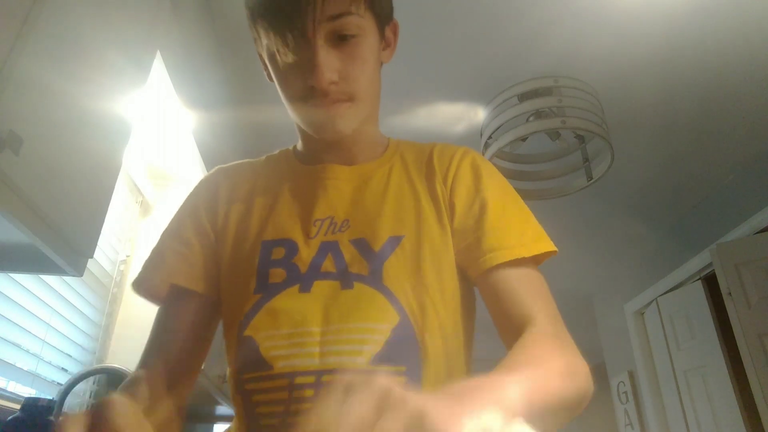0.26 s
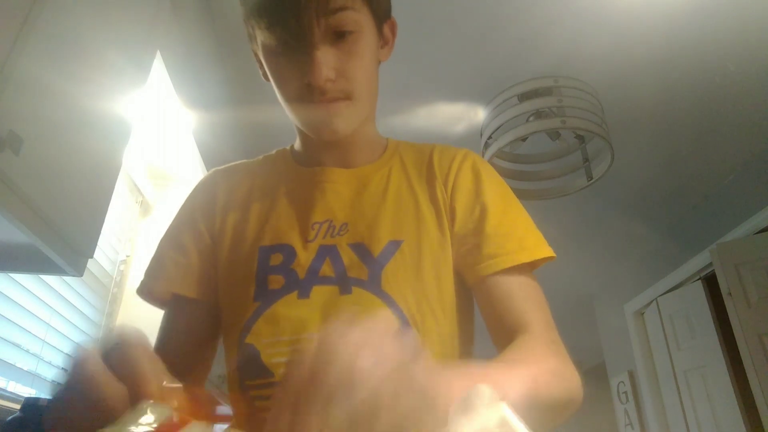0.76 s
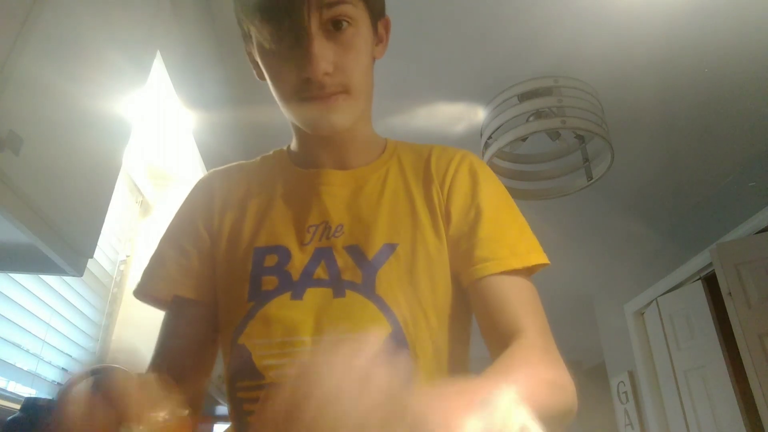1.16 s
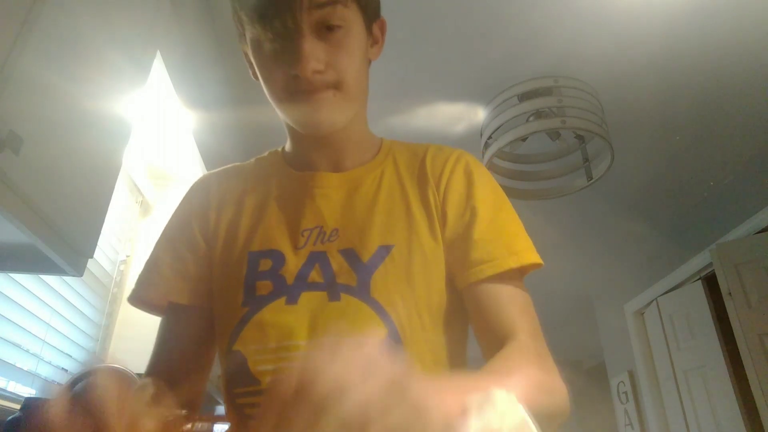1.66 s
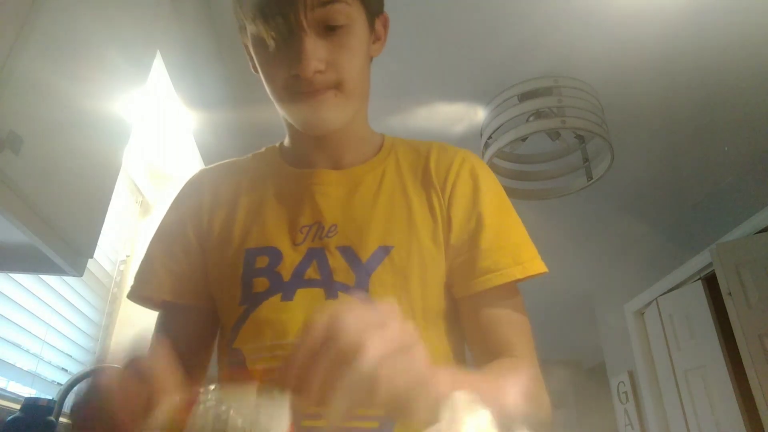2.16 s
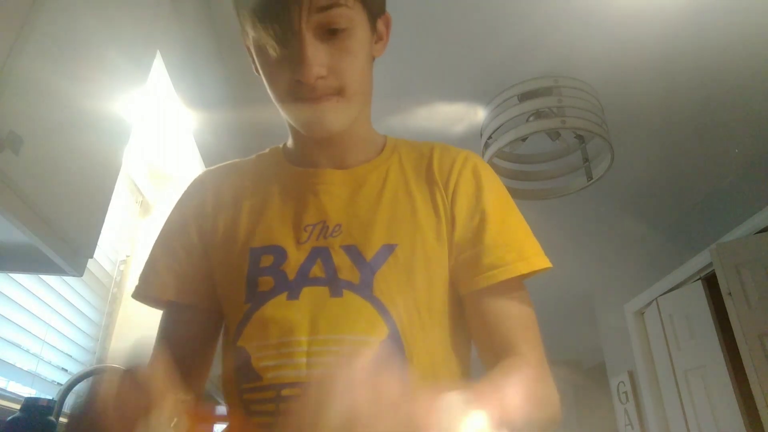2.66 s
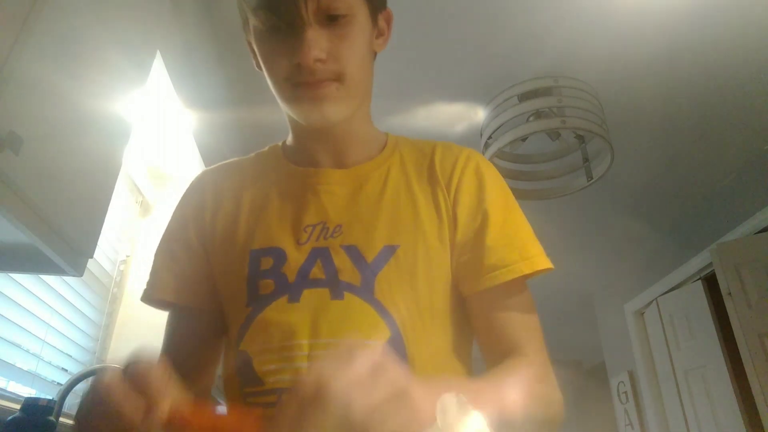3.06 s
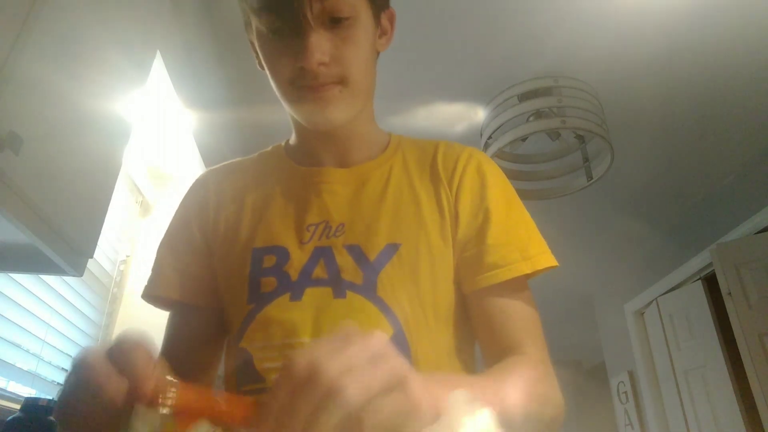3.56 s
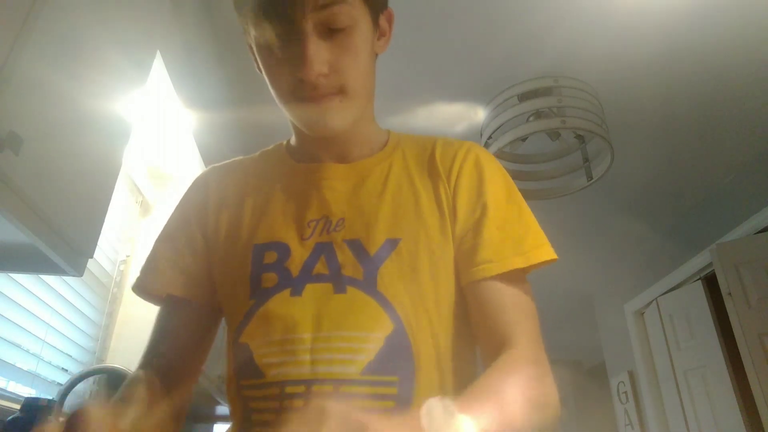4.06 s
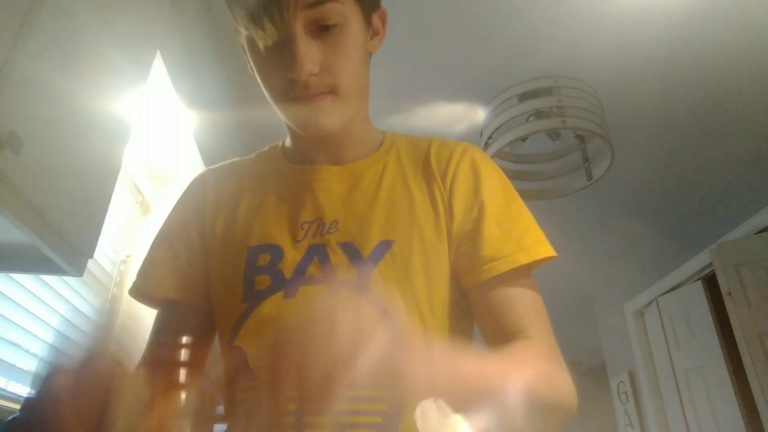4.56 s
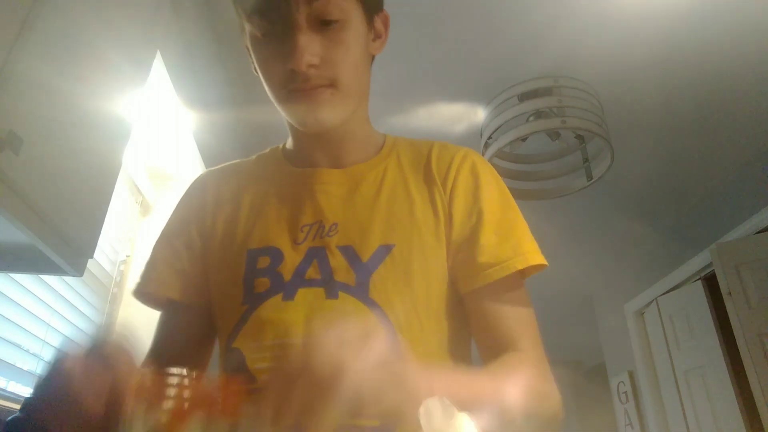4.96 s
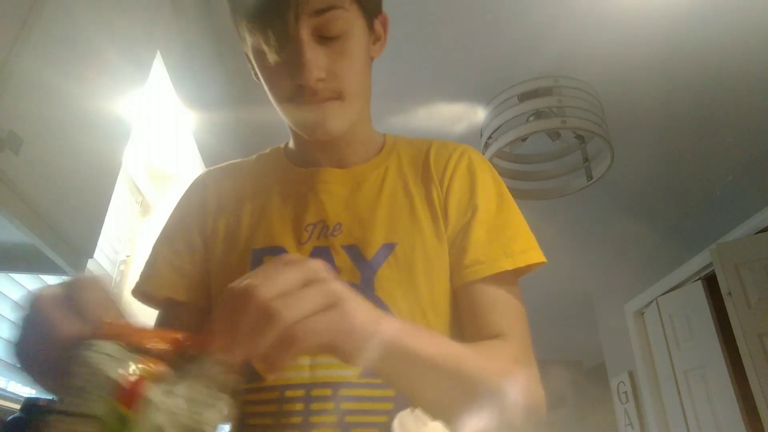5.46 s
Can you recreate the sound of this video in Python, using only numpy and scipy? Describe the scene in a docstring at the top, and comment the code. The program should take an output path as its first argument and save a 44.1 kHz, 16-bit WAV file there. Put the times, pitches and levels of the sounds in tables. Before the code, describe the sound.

A crisp foil bag of chips is shaken hard by hand about four times a second, crinkling and rattling continuously up close.

```python
"""Shaking a bag of chips

A bag of chips is shaken by hand about four times a second, close to two microphones in a small kitchen.
At each jerk the chips hit the foil and fall back a moment later. Shared random impacts drive three filters:
the crackling foil, the hollow air in the bag and the thumping load. Between jerks chips slide in uneven clumps.
Creases snap as short filtered noise bursts, and the bag walls pop as brief rounded tones.
Hand rumble, a short reverberation, quiet room noise and a wavering hum complete the sound.
"""
import sys
import numpy as np
from scipy import signal
from scipy.fft import rfft, irfft, next_fast_len
from scipy.io import wavfile
from scipy.ndimage import uniform_filter1d

SR = 44100
rng = np.random.default_rng(int(sys.argv[2]) if len(sys.argv) > 2 else 0)


def unload_wav(signal):
    """Save mono or channel-first audio to the path in sys.argv[1] as 16-bit WAV at rate SR, clipped to [-1, 1]."""
    wavfile.write(
        sys.argv[1],
        SR,
        np.round(np.clip(np.atleast_2d(signal).T, -1, 1) * 32767).astype(np.int16),
    )


N = 252516
TIME = np.arange(N) / SR

# Jerks of the bag: start_s, rise_s, settle_s, knock_db, crackle_relative_to_knock_db,
# fall_back_delay_s, fall_back_relative_to_knock_db
JERKS = [(0.086, 0.014, 0.0076, -21.5, -3.5, 0.097, -8.5), (0.281, 0.017, 0.022, -27, -3.5, 0.066, 0.5),
         (0.483, 0.0025, 0.029, -24, 0, 0.078, -6), (0.671, 0.027, 0.014, -26.5, -2.5, 0.048, -9),
         (0.914, 0.0094, 0.013, -30, -4.5, 0.027, 0), (1.027, 0.043, 0.016, -24, -1.5, 0.12, -5),
         (1.257, 0.017, 0.016, -20, -6.5, 0.087, -11.5), (1.439, 0.023, 0.012, -22.5, -2.5, 0.092, -4.5),
         (1.618, 0.023, 0.02, -26.5, 1.5, 0.093, -3), (1.985, 0.02, 0.016, -21.5, 0.5, 0.096, -9.5),
         (2.295, 0.0048, 0.018, -21.5, -3, 0.14, -9.5), (2.52, 0.021, 0.011, -22.5, -3, 0.099, -14),
         (2.766, 0.006, 0.024, -22, -4, 0.088, -13.5), (3.025, 0.0094, 0.009, -21.5, -6, 0.067, -11.5),
         (3.26, 0.0079, 0.027, -20, -0.5, 0.077, -6), (3.5, 0.0045, 0.02, -17, -1.5, 0.076, -9.5),
         (3.738, 0.0095, 0.0051, -21.5, 1, 0.068, -9), (3.927, 0.013, 0.026, -21.5, -1.5, 0.07, -1),
         (4.081, 0.037, 0.015, -23, 0.5, 0.088, -5.5), (4.272, 0.011, 0.012, -19.5, -3.5, 0.12, -5),
         (4.649, 0.0043, 0.022, -21, 0, 0.07, -8), (4.915, 0.0075, 0.015, -18.5, -1, 0.062, -5.5),
         (5.15, 0.014, 0.0076, -22, -2, 0.048, -8), (5.299, 0.024, 0.031, -25, -0.5, 0.084, -5),
         (5.583, 0.017, 0.019, -31, 1.5, 0.11, 3)]
# Loose chips sliding, before the trims in slides(): time_s, hollow_knock_db, crackle_db
SLIDING_LEVELS = [(0.0, -35, -37.5), (0.62, -37.5, -39.5), (0.85, -33.5, -34.5), (1.59, -32.5, -37.5),
                  (1.94, -34.5, -36), (2.1, -38.5, -42.5), (2.29, -42.5, -44), (2.71, -33.5, -36.5),
                  (3.11, -38.5, -39.5), (4.1, -32.5, -37.5), (4.31, -37.5, -41), (4.43, -39.5, -49.5),
                  (4.67, -48, -45), (5.01, -43, -50.5), (5.15, -35, -38), (5.28, -33, -38),
                  (5.45, -42.5, -44.5), (5.73, -37.5, -44)]
# Loudest snapping creases, before the trims in snaps():
# start_s, tick_level_db (as if packed into 4 ms), treble_tilt_db, bag_knock_db
CREASE_SNAPS = [(0.0178, -27, -2, -29), (0.081, -25.5, 5, -26), (0.1032, -20.5, 1, -22.5),
                (0.498, -22.5, 15, -20.5), (0.7195, -25, -4, -24), (0.7384, -26.5, -2, -25),
                (0.844, -19.5, 0, -28), (1.0354, -24.5, 0, -38), (1.2, -23, 8, -31),
                (1.238, -21.5, -2, -23), (1.272, -21, -2, -26), (1.278, -22.5, 1, -25),
                (1.3645, -22, -1, -24), (1.387, -25, -5, -47), (1.4602, -23, 5, -24), (1.5735, -21, 5, -34),
                (1.6233, -22, 4, -28), (1.763, -23, 2, -37), (1.8184, -22, 1, -27),
                (1.9702, -22.5, 21, -27), (2.0575, -26, -3, -33), (2.1348, -27, 3, -30.5),
                (2.539, -21, -10, -21), (2.7766, -18.5, 2, -14.5), (2.8033, -22.5, -1, -29),
                (2.897, -25, -3, -39), (2.956, -23.5, -1, -21.5), (3.0269, -22, 1, -42),
                (3.2375, -26, -2, -27), (3.3482, -21.5, -7, -28), (3.5197, -20, 6, -26),
                (3.7524, -21, 1, -14), (3.9782, -20, -8, -33), (4.014, -27.5, 5, -23),
                (4.41, -24, -27, -42), (4.618, -29, 0, -26), (4.6538, -27, 0, -20.5),
                (4.9257, -27, -2, -27), (5.3031, -24.5, 0, -45), (5.3322, -21.5, 0, -26),
                (5.4085, -25, 11, -36), (5.51, -24.5, 5.5, -25.5)]
# Bag walls bulging and popping the air, before the trim in pops(): start_s, peak_db, pitch_hz
WALL_POPS = [(0.101, -10, 860), (1.625, -15.5, 1020), (1.83, -14, 1180), (2.308, -6, 1010),
             (2.515, -16, 1270), (2.776, -21, 880), (3.284, -3.5, 770), (3.938, -7, 1050),
             (4.113, -5, 1020), (4.28, -5.5, 750), (4.633, -11, 1060), (4.659, -2.5, 1100),
             (5.326, -7, 980)]
# Rumble of the hands, before the trim in handling(): time_s, level_db
HAND_LEVELS = [(0.0, -59), (1.3, -47.5), (1.75, -59), (1.93, -47), (2.2, -56), (3.25, -48), (3.7, -58),
               (4.3, -44), (4.46, -51), (4.57, -41), (4.8, -57), (5.3, -49), (5.72, -58)]
# Tone colour of the air-filled bag: frequency_hz, relative_level_db
BAG_COLOUR = [(250, -19), (390, -5), (480, -1.5), (560, -3.5), (730, -10), (830, -6.5), (930, -0.5),
              (1000, -5), (1080, -0.5), (1300, -5), (1500, -12.5), (1800, -12.5), (2100, -17.5),
              (3000, -21.5)]
# Tone colour of the foil skin: frequency_hz, relative_level_db
FOIL_COLOUR = [(1300, -21), (2050, -28), (2300, 1), (3100, -3.5), (3600, -7), (4300, 0.5), (5800, -2),
               (7000, -2.5), (7900, -6), (9100, -11.5), (10400, -7), (11500, -13.5), (13200, -12.5),
               (15600, -14.5)]
# Tone colour of the load as a whole: frequency_hz, relative_level_db
LOAD_COLOUR = [(30, -36), (70, -14), (140, -8.5), (200, -5.5), (300, -4.5), (360, -10), (520, -36),
               (1200, -53.5)]
# Tone colour of the hand rumble: frequency_hz, relative_level_db
HAND_COLOUR = [(30, -18), (55, -14), (85, -9), (110, -6), (150, -16.5), (300, -15.5)]
# Tone colour of the still kitchen: frequency_hz, relative_level_db
KITCHEN_COLOUR = [(20, -32), (36, -20), (55, 11), (80, 8), (110, -6), (160, -14), (300, 11.5), (1000, -54),
                  (4000, -64), (16000, -73)]
# Time for the reverberation to fall by 60 dB: frequency_hz, decay_s
ROOM_DECAY = [(150, 0.26), (1000, 0.41), (6000, 0.26), (15000, 0.13)]
# Left microphone level over the right: frequency_hz, difference_db
MIC_BALANCE = [(50, -7), (110, 5), (220, 11), (380, 2.5), (500, 5.5), (720, -0.5), (920, 3.5), (1100, -0.5),
               (1600, 4), (2300, -0.97), (4700, 1), (7000, -0.6), (10000, 3), (15000, 3.2)]
# Likeness of the two microphones, before the far-side reflection: frequency_hz, correlation (no unit)
MIC_LIKENESS = [(100, 0.96), (240, 0.64), (370, 0.79), (480, 0.86), (1100, 1), (1750, 0.89), (2300, 1),
                (4700, 1), (9000, 0.9), (15000, 0.91)]
# Extra phase lag at the microphone reached later: frequency_hz, lag_radians
MIC_PHASE = [(110, -1.56), (200, 0.36), (270, 1.48), (370, 0.36), (470, 0.85), (660, 0.43), (760, -0.11),
             (1000, 0.68), (1500, -0.36), (2320, 0.037), (4700, -0.23), (6900, 0.23), (9250, 0.41),
             (11500, -0.18), (14000, -0.052)]
# Reflection from the other side, against the direct sound: frequency_hz, relative_level_db
FAR_SIDE_LEVEL = [(600, -21), (1100, -48), (1700, -4), (2600, -15), (6000, -13), (15000, -11)]

FALL_BACK_RISE_S, FALL_BACK_SETTLE_S = 0.022, 0.01
FALL_BACK_CRACKLE_DB, THUMP_DB = -1, -13  # against the knock of the same shower
# Just before each landing the chips are in the air and slide less
FLIGHT_LEAD_S, FLIGHT_WIDTH_S, FLIGHT_DIP_DB = 0.071, 0.035, -2.5
EDGE_HZ = 15850  # upper edge of the recorder's band


def chips(sliding_per_s=1300, shower_per_s=3800, own_crackle=0.72):
    """The same impacts drive the hollow bag, its foil and the load; the foil also crinkles by itself."""
    power, slide = showers(), slides()
    hits = np.sqrt(power) * impacts(shower_per_s, spread_db=3.5)
    hits = hits + slide * impacts(sliding_per_s, spread_db=4.5)
    knock, crackle, thump = hits
    crinkle = np.sqrt(power[1] + slide[1] ** 2) * impacts(per_s=2600, spread_db=2.5)
    crackle = (crackle + own_crackle * crinkle) / np.hypot(1, own_crackle)

    knock_grains = scatter(knock, decay=0.0015, low_hz=435, high_hz=2060, ringing=0.32)
    bag_sound = played(knock, knock_grains, BAG_COLOUR)
    crackle_grains = scatter(crackle, decay=0.0021, low_hz=2460, high_hz=14900, ringing=0.62)
    foil_sound = played(crackle, crackle_grains, FOIL_COLOUR)
    thump_grains = scatter(thump, decay=0.0025, low_hz=130, high_hz=380, ringing=0.047)
    load_sound = played(thump, thump_grains, LOAD_COLOUR)
    return bag_sound + foil_sound + load_sound


def showers():
    """Every jerk throws the chips against the foil; a second shower follows as they fall back."""
    power = np.zeros((3, N))
    for s, rise, settle, db, crackle_db, delay, back_db in JERKS:
        thrown = shower(rise, settle, db, crackle_db)
        fallen = shower(FALL_BACK_RISE_S, FALL_BACK_SETTLE_S, db + back_db, FALL_BACK_CRACKLE_DB)
        for part, first, second in zip(power, thrown, fallen):
            add(part, s, first)
            add(part, s + delay, second)
    return power


def shower(rise, settle, knock_db, crackle_db):
    """As a load of chips lands, the power of knock, crackle and thump swells, then dies away."""
    t = np.arange(SR // 5) / SR
    swell = np.minimum(t / max(rise, 1e-3), 1)
    fade = np.exp(-2 * np.maximum(t - rise, 0) / max(settle, 1e-3))
    peak = amp(knock_db + np.array([[0], [crackle_db], [THUMP_DB]]))
    return peak ** 2 * swell * fade


def slides(hollow_db=0.43, crisp_db=3.0, thump_db=-13, clump_db=2.4, size=1100):
    """Loose chips slide in uneven clumps, which vary the strength of knock, crackle and thump together."""
    hollow, crisp = sliding(TIME)
    smooth = uniform_filter1d(uniform_filter1d(rng.standard_normal(N), size), size)
    clumps = unit(smooth)
    levels = np.array([hollow + hollow_db, crisp + crisp_db, hollow + thump_db])
    return amp(levels + clump_db * clumps)


def sliding(s):
    """Knock and crackle levels of sliding chips, in dB; both dip while the chips are in the air."""
    at, *levels = np.transpose(SLIDING_LEVELS)
    airborne = sum(np.exp(-((s - jerk[0] + FLIGHT_LEAD_S) / FLIGHT_WIDTH_S) ** 2) for jerk in JERKS)
    return np.array([np.interp(s, at, db) for db in levels]) + FLIGHT_DIP_DB * airborne


def impacts(per_s, spread_db, size=1100):
    """Random impacts of very unequal strength, their power evened out over a few hundredths of a second."""
    strength = amp(spread_db * np.minimum(rng.exponential(1, N), 4))
    hits = strength * (rng.random(N) < per_s / SR)
    power = uniform_filter1d(uniform_filter1d(hits ** 2, size), size // 2)
    return hits / np.sqrt(np.abs(power) + 1e-4)


def scatter(hits, decay, low_hz, high_hz, ringing, count=36):
    """Every impact falls on one of many spots of the bag, each with a short ring of its own pitch."""
    spot, out = rng.integers(0, count, N), np.zeros((2, N))
    for k, hz in enumerate(np.geomspace(low_hz, high_hz, count)):
        burst = contact(decay * rng.uniform(0.58, 1.75))
        tone = signal.lfilter(*signal.iirpeak(hz, 3, fs=SR), burst)
        grain = unit(burst) + ringing * unit(tone)
        grain /= np.linalg.norm(grain, axis=1, keepdims=True)
        spot_hits = hits * (spot == k)
        out += signal.oaconvolve(spot_hits[None], grain, axes=1)[:, :N]
    return out


def contact(decay, size=512, rise=0.00024):
    """A tiny noise burst of buckles that swells and dies, by the direct path and by a reflected one."""
    t = np.arange(size) / SR
    burst = rng.standard_normal((2, size)) * (1 - np.exp(-t / rise)) * np.exp(-t / decay)
    return burst / np.linalg.norm(burst, axis=1, keepdims=True)


def played(hits, grains, colour):
    """Colours the grains and gives them the overall power of the impacts."""
    return unit(through(grains, colour)) * np.std(hits)


def snaps(knock_db=-2, bright_db=3, hinge_hz=6500, flutter=1.4, ripple_db=-0.5, size=2048):
    """A crease flips: a sharp tick, a short flutter of the foil and a knock of the air inside."""
    out, hz = np.zeros((2, N)), np.fft.rfftfreq(size, 1 / SR)
    foil, bag = rfft(ring(FOIL_COLOUR), size), rfft(ring(BAG_COLOUR), size)
    first = np.sqrt(.004 * SR / size)  # sets the energy to that of 4 ms at the given level
    octave = np.log2(hz / hinge_hz + 1e-6)
    for s, db, top_db, hollow_db in CREASE_SNAPS + small_snaps():
        flip = rfft(contact(decay=0.00093) + flutter * contact(decay=0.0068), size)
        tilt_db = (top_db + bright_db) * 0.95 * np.tanh(0.57 * octave)
        # Each crease has its own resonances
        ripple = np.sin(2 * np.pi * (rng.uniform(1.0, 1.49) * octave + rng.random()))
        crease_gain = amp(tilt_db + ripple_db * ripple)
        for path, burst in zip(out, flip):
            tick = unit(irfft(burst * foil * crease_gain))
            knock = unit(irfft(burst * bag))
            add(path, s, first * (amp(db) * tick + amp(hollow_db + knock_db) * knock))
    return out


def small_snaps(count=56, over_slide_db=6, spread_db=2.5, top_db=-1, top_spread_db=2.0, hollow_db=-7):
    """Extra creases flip at random moments, louder where the slide crackles more; rows as in CREASE_SNAPS."""
    s = (np.arange(count) + rng.random(count)) / count * N / SR
    strength, colour = rng.standard_normal((count, 2)).T
    db = sliding(s)[1] + over_slide_db + spread_db * strength
    return list(zip(s, db, top_db + top_spread_db * colour, db + hollow_db))


def pops(pop_db=-5.0, width=0.00071):
    """A wall of the bag bulges and the air inside gives two or three rounded cycles."""
    out, t = np.zeros((2, N)), np.arange(-128, 256) / SR
    for s, db, hz in WALL_POPS:
        for path in out:
            wave = np.sin(2 * np.pi * (hz * t + rng.random()))
            swell = np.exp(-(t / width - 1) ** 2 / 2)
            add(path, s + t[0], amp(db + pop_db) * swell * wave)
    return out


def handling(rumble_db=-1):
    """The hands and arms rumble softly as they move: low noise with a changing level."""
    s, db = np.transpose(HAND_LEVELS)
    rumble = unit(through(rng.standard_normal((2, N)), HAND_COLOUR))
    return amp(np.interp(TIME, s, db) + rumble_db) * rumble


def walls(x, size=16384):
    """The kitchen's short reverberation is a fading noise tail; the highest treble dies first."""
    hz, t, z = signal.stft(rng.standard_normal((2, size)), SR, nperseg=256)
    fade = amp(-60 * t / read(ROOM_DECAY, hz)[:, None])
    tail = signal.istft(z * fade, SR, nperseg=256)[1]
    tail *= np.minimum(np.arange(tail.shape[1]) / SR / 0.0091, 1)  # builds up over 9.1 ms
    return signal.oaconvolve(x, tail / np.linalg.norm(tail[0]), axes=1)[:, :N]


def kitchen(air_db=-60, hum_db=-60, hum_hz=116.0, drone_db=-62, drone_hz=205):
    """Low room noise, and an appliance hum of two tones whose pitch wavers."""
    air = unit(through(rng.standard_normal((2, N)), KITCHEN_COLOUR))
    waver = unit(uniform_filter1d(rng.standard_normal(N), size=6000))
    hum = np.zeros(N)
    for hz, db in ((hum_hz, hum_db), (drone_hz, drone_db)):
        cycles = np.cumsum(hz + 2.55 * waver) / SR
        hum += amp(db) * np.sqrt(2) * np.sin(2 * np.pi * cycles)
    return amp(air_db) * air + hum * amp([[2], [-4]])  # the hum is 6 dB louder on the left


def amp(db):
    """Decibels to gain."""
    return 10 ** (np.asarray(db) / 20)


def unit(x):
    """Scales to an rms (average strength) of 1."""
    return x / np.sqrt(np.mean(x ** 2) + 1e-20)


def read(points, hz):
    """Reads a table on a logarithmic frequency axis."""
    f, value = np.transpose(points)
    return np.interp(np.log(hz + 1), np.log(f + 1), value)


def add(mix, s, sound):
    """Lays a sound into the mix at time s."""
    part = mix[max(round(s * SR), 0):][:len(sound)]
    part += sound[:len(part)]


def ring(colour, size=4096):
    """The response of a body of this colour to one tap, starting at once and with energy 1."""
    hz = np.fft.rfftfreq(size, 1 / SR)
    low_skirt = 1 + (colour[0][0] / (hz + 1)) ** 2
    high_skirt = (1 + (hz / colour[-1][0]) ** 8) ** .25
    log_gain = np.log(amp(read(colour, hz)) / (low_skirt * high_skirt))
    # The Hilbert transform finds the phase that puts the energy as early as possible
    both_sides = np.r_[log_gain, log_gain[-2:0:-1]]
    response = np.fft.ifft(np.exp(np.conj(signal.hilbert(both_sides)))).real
    return response / np.linalg.norm(response)


def through(x, colour):
    """Lets x excite a body of this colour."""
    return signal.oaconvolve(x, ring(colour)[None], axes=1)[:, :N]


def microphones(paths):
    """Opposite polarity; direct sound reaches the left microphone first, a reflection the right one."""
    size = next_fast_len(N + 4096)
    size += size % 2
    hz = np.fft.rfftfreq(size, 1 / SR)
    lag = .000432  # seconds between the microphones
    direct, reflected = rfft(paths, size)
    same = np.clip(read(MIC_LIKENESS, hz), 0, 1)
    shared = np.sqrt((1 + same) / 2) * direct
    apart = np.sqrt((1 - same) / 2) * reflected
    ratio, far = amp(read(MIC_BALANCE, hz)), amp(read(FAR_SIDE_LEVEL, hz))
    late = np.exp(-1j * (2 * np.pi * hz * lag + read(MIC_PHASE, hz)))
    left = (shared + apart + far * reflected * late) * ratio
    right = -((shared - apart) * late + far * reflected)
    even_power = np.sqrt(2 / (1 + ratio ** 2) / (1 + far ** 2))
    return irfft(np.array([left, right]) * even_power, size)[:, :N]


def scene():
    """The bag, its reverberation and the hands at the two microphones, over the quiet kitchen."""
    bag = chips() + snaps() + pops()
    return microphones(bag + amp(-15.0) * walls(bag) + handling()) + kitchen()


def record(dry):
    """The recorder's band limit: a steep filter removes the highest treble."""
    low_pass = signal.firwin(511, EDGE_HZ, window=("kaiser", 9), fs=SR)
    return signal.oaconvolve(dry, low_pass[None], "same")


dry = scene()
out = record(dry)
unload_wav(out)
```